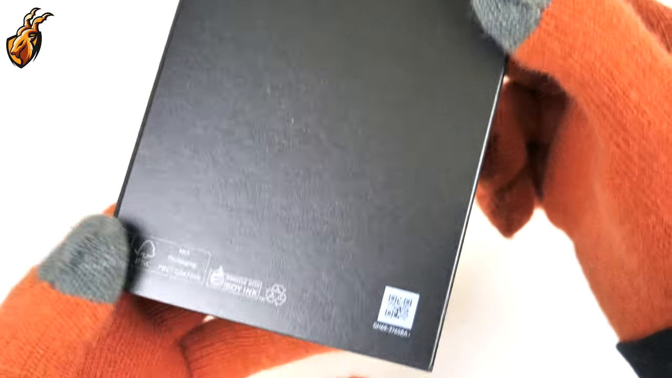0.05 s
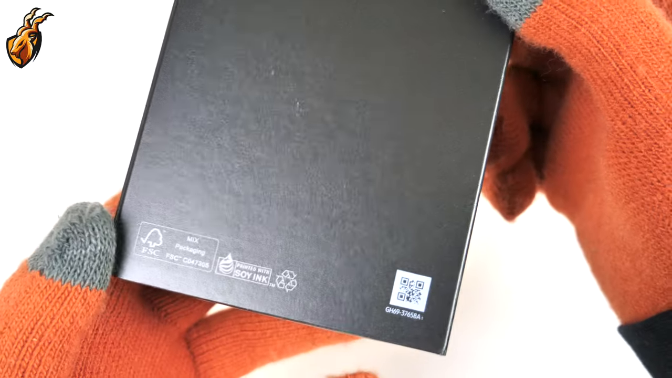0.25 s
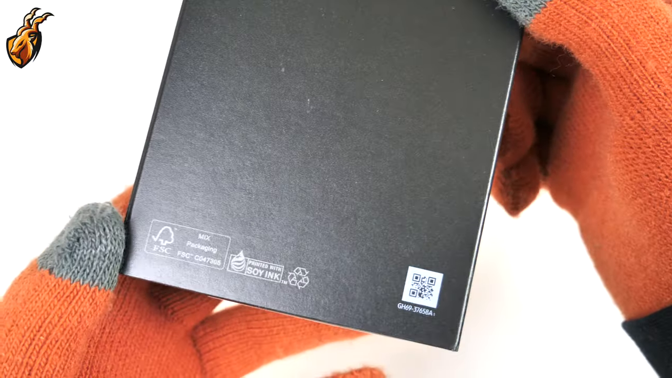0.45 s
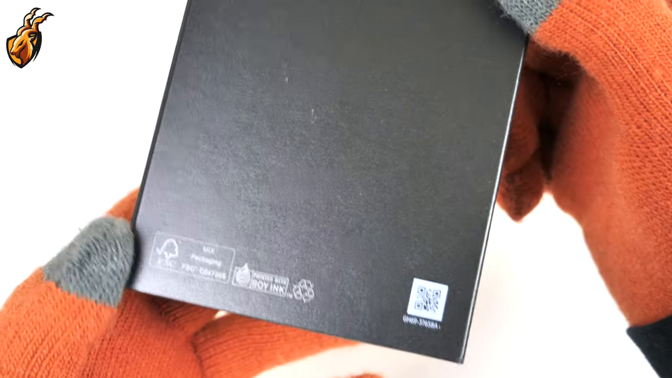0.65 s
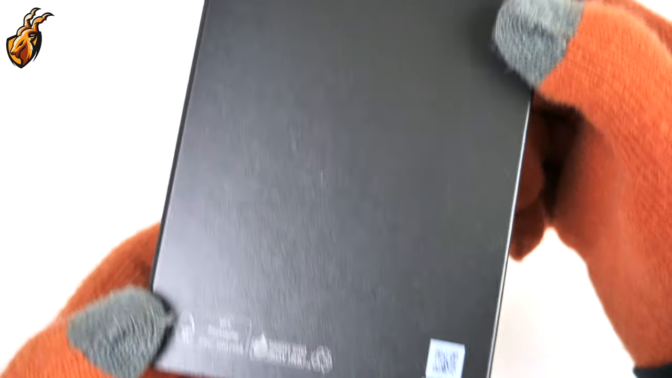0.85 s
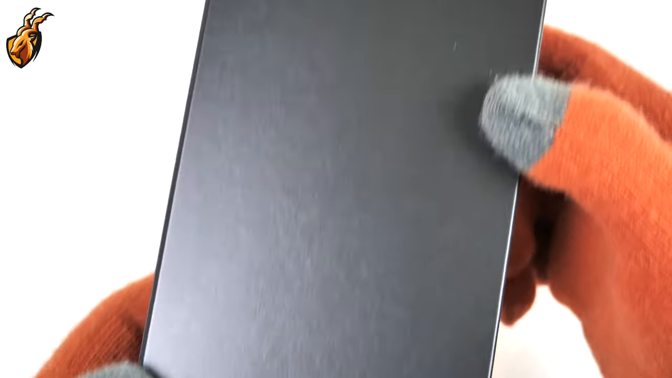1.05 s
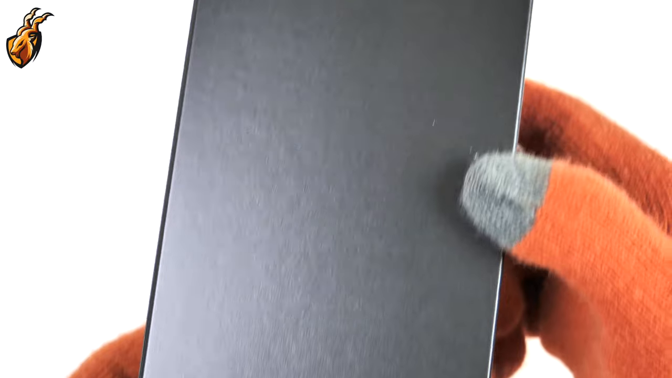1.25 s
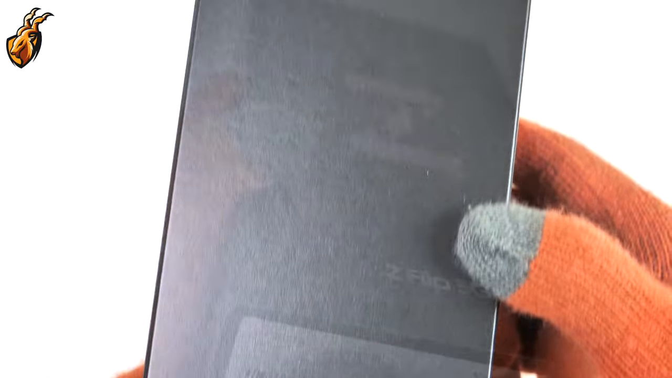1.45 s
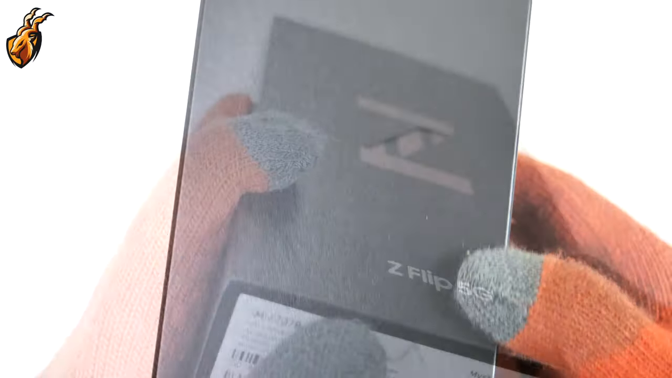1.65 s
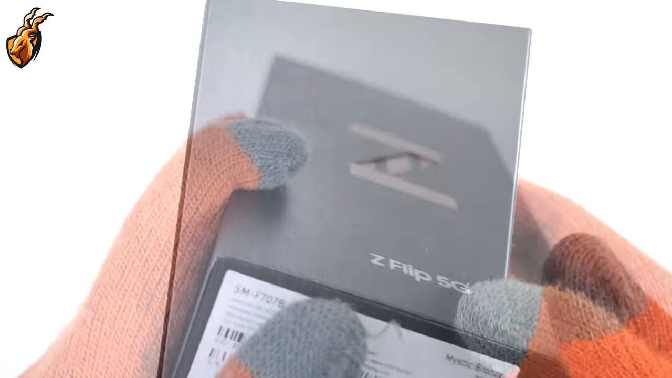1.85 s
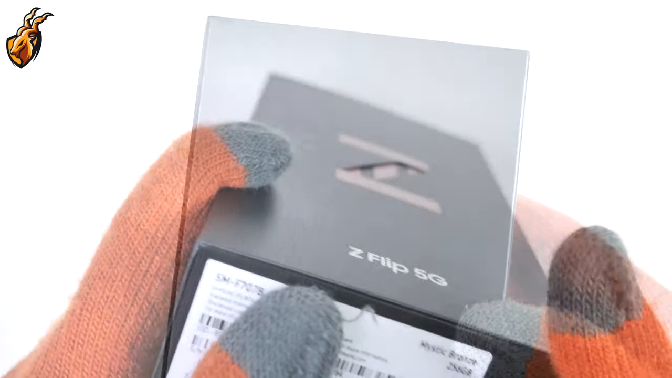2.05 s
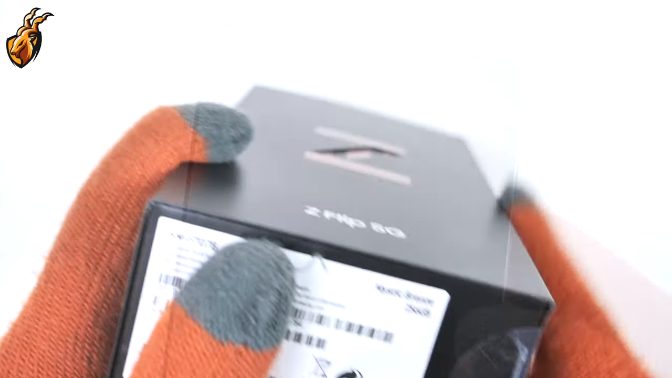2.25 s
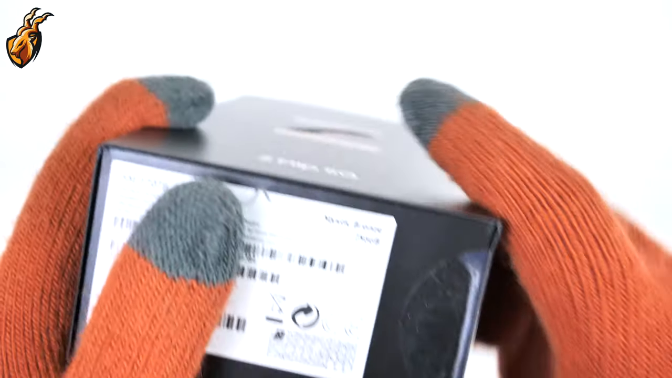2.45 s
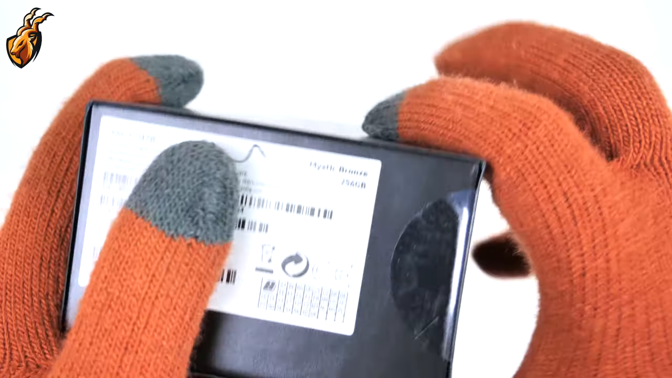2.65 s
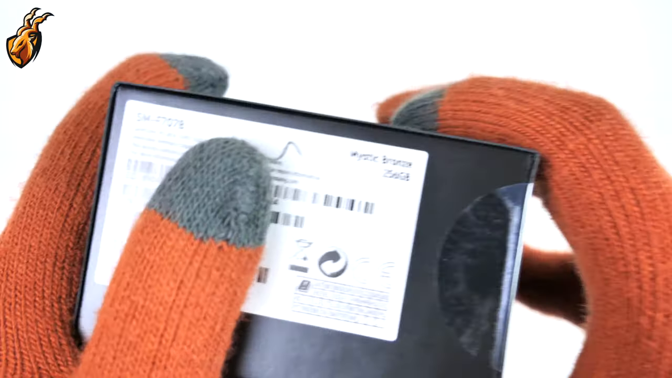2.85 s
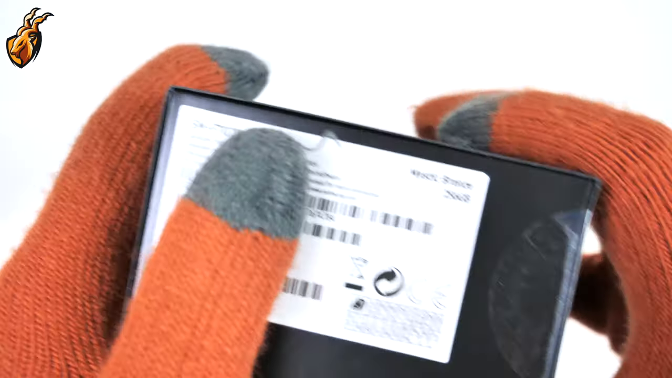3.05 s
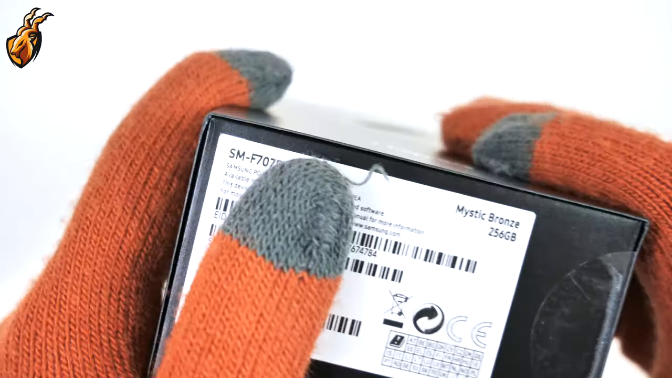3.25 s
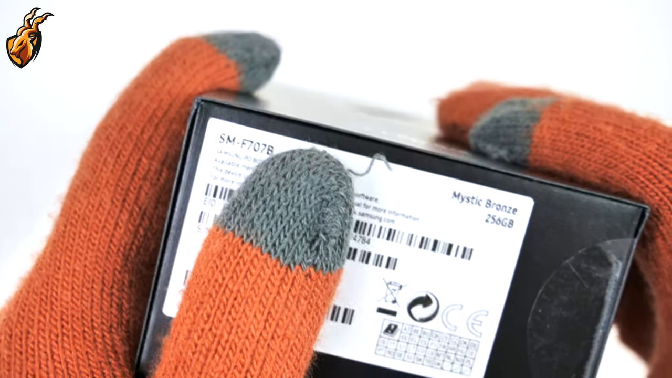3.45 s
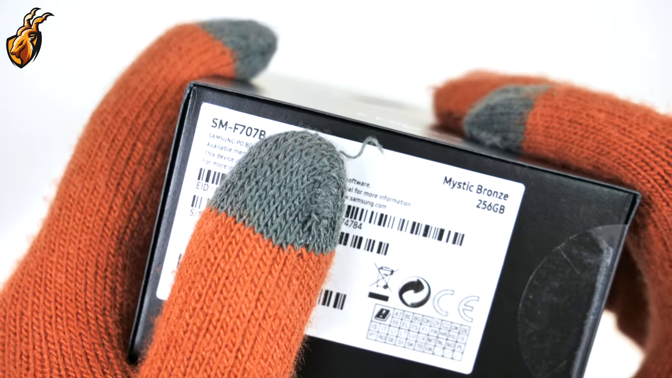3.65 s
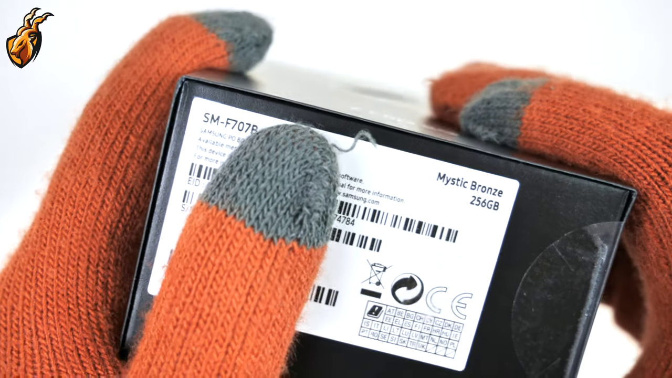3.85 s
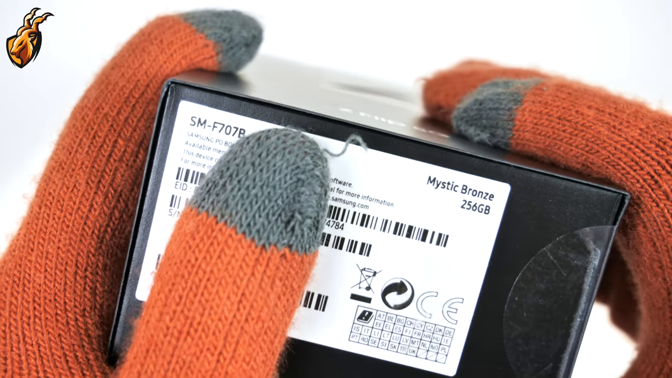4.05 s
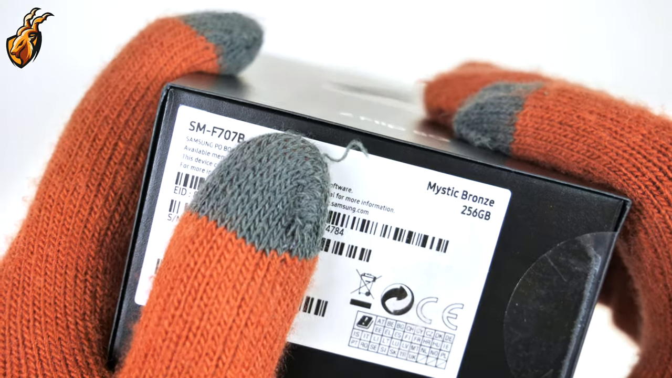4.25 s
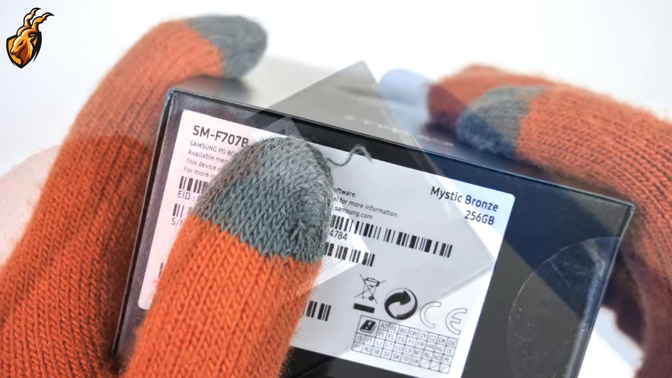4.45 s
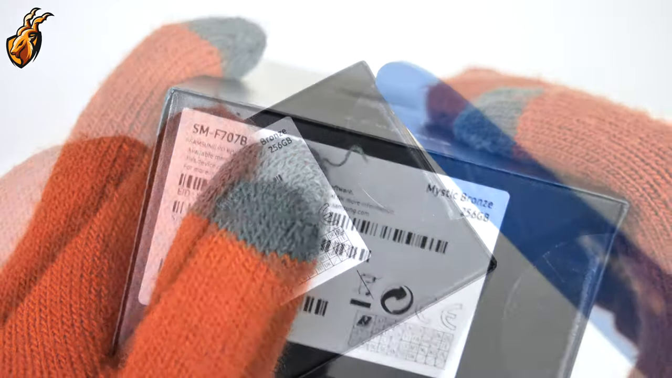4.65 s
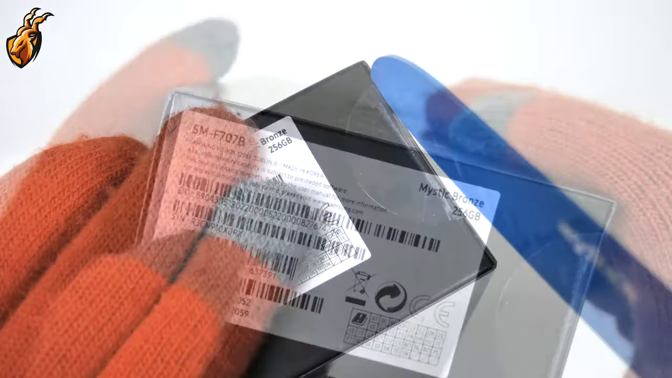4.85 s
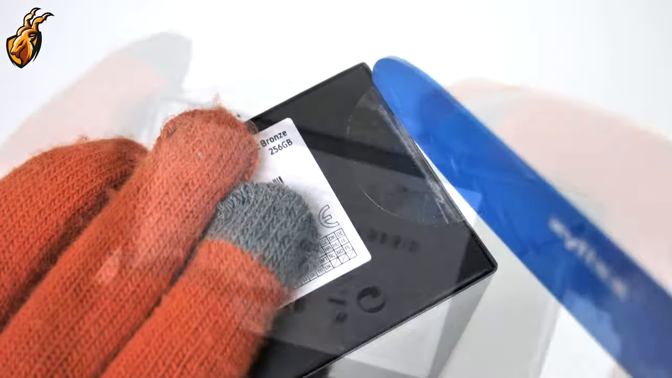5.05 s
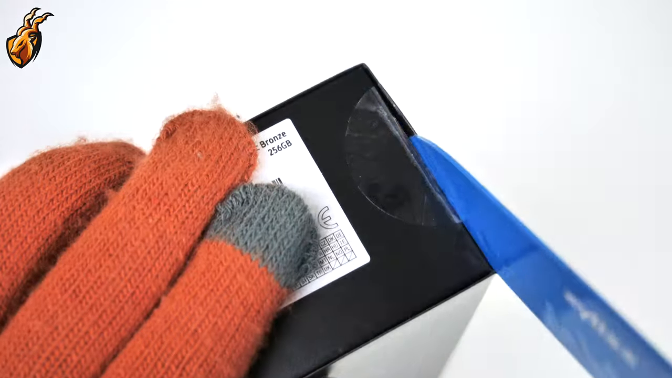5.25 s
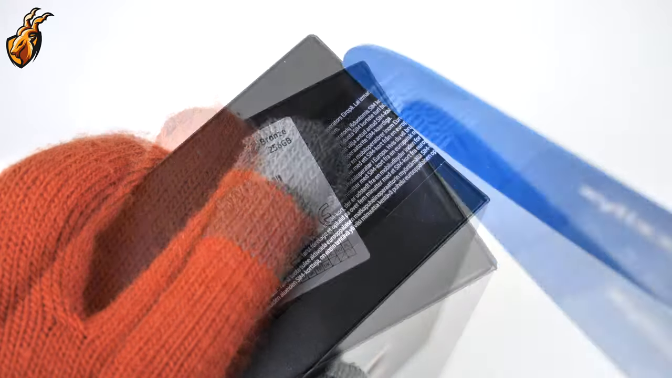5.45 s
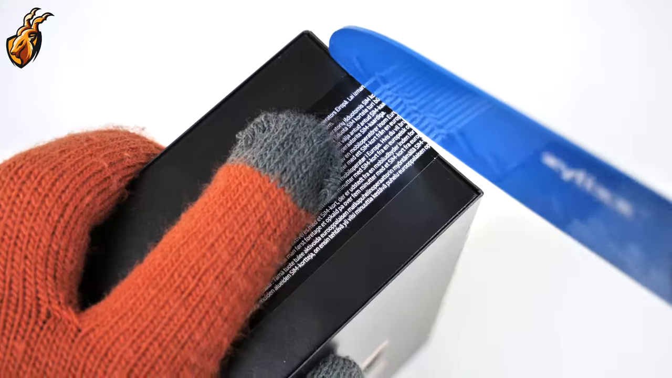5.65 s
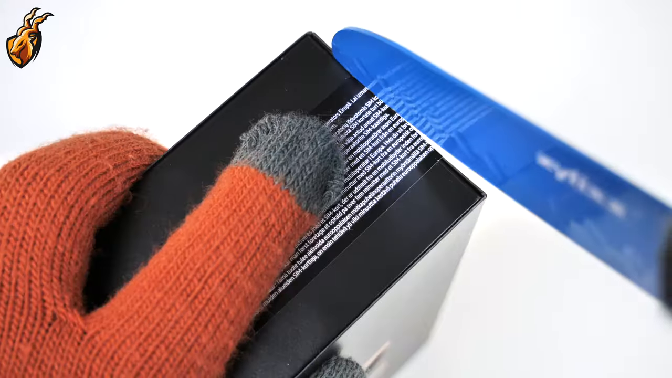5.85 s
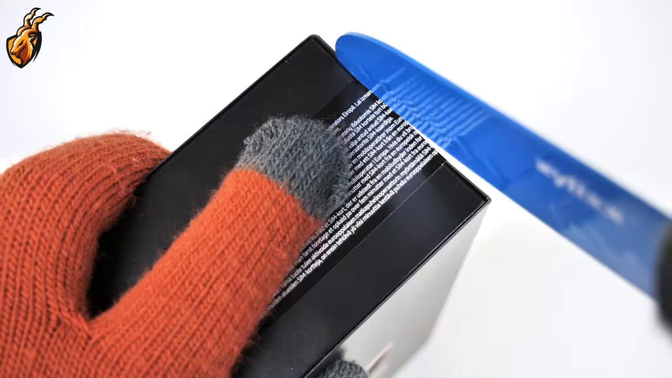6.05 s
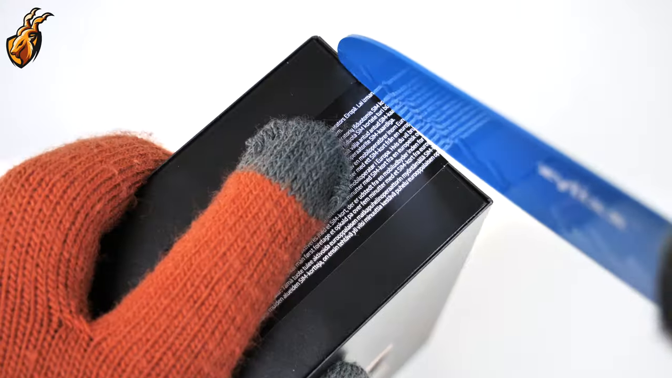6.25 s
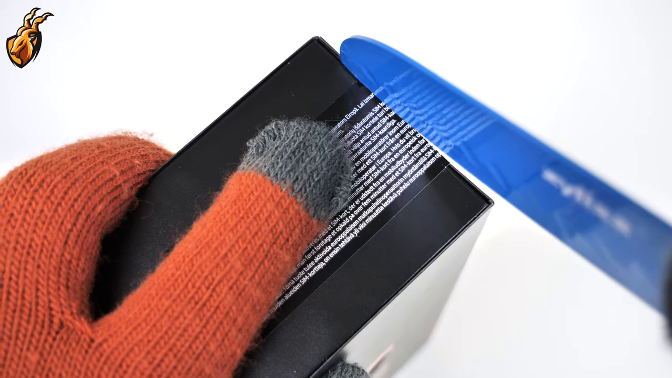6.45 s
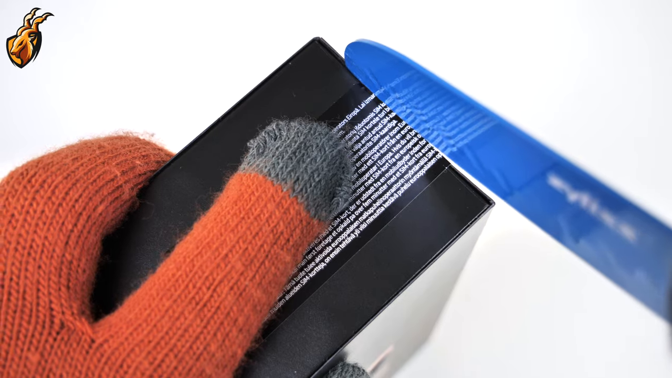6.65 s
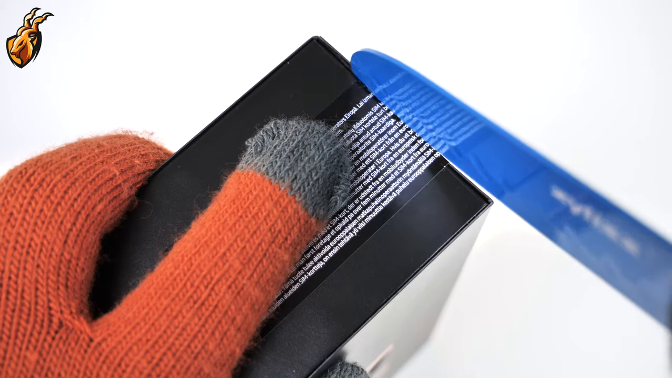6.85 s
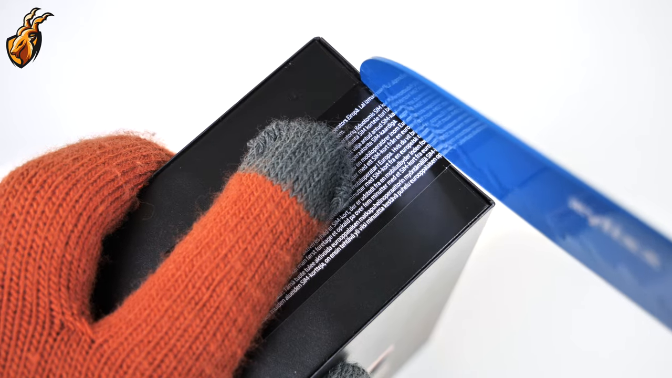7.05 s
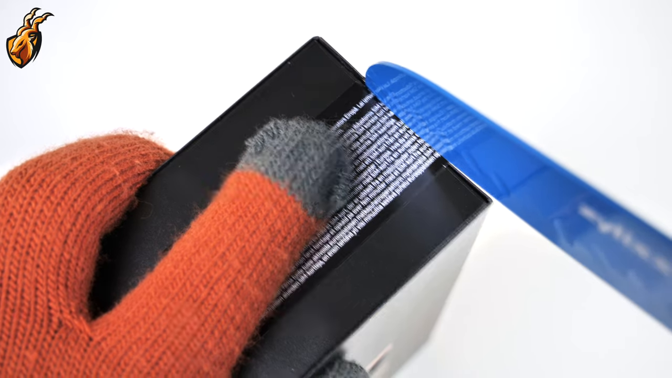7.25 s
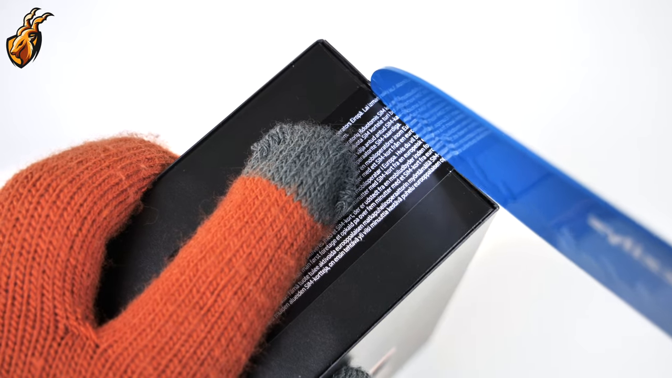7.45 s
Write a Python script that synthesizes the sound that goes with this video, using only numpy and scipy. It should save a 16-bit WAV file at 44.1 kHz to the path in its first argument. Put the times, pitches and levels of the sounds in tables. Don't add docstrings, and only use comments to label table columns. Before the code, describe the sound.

A small quiet room, heard very close, with steady soft hiss and faint low hum. From 0 to 1.8 seconds knitted gloves brush lightly over stiff card, with a tiny tick near 0.3 and a faint sliding thumb around 0.7 to 1.2. At about 1.95 a low hollow double knock of box and desk starts busier handling: woolly scrapes, snags and dry ticks until 3.1, with desk rumble and a softer double thump near 2.6. Then it is nearly still, with small snags at 3.4 and 4.1. Light shifting and a dull bump come at 4.6 to 4.8. At 5.11 to 5.16 tape rips in a brief crackle, peaking in a very loud, overloaded hollow crack. A sharp click follows at 5.42, fainter clicks near 5.65. Quiet handling leads to a much weaker rip and knock at 6.73, then faint rubbing, a tick at 7.0 and thin clicks around 7.4.

```python
import sys
import numpy as np
from scipy import signal
from scipy.fft import rfft, irfft
from scipy.io import wavfile
from scipy.ndimage import uniform_filter1d

SR = 44100
rng = np.random.default_rng(int(sys.argv[2]) if len(sys.argv) > 2 else 0)


def elevation(decibels):
    levels = np.asarray(decibels, float)
    return 10 ** (levels / 20)


def wrap_up_sound(samples):
    columns = np.atleast_2d(samples).T
    tamed = np.clip(columns, -1, 1)
    steps = np.round(tamed * 32767).astype(np.int16)
    wavfile.write(sys.argv[1], SR, steps)


N = 331632

# (start [s], length [s], weave scrape [dB], brightness [dB], card body over scrape [dB])
STROKES = [(-.17, .33, -56, 0.5, -5.5), (0.086, 0.32, -69.5, -0.5, 1.5), (0.593, 0.47, -64, -4, -3),
           (0.973, 0.31, -59.5, -5, -6), (1.45, 0.23, -71.5, -5, -2), (2.059, 0.2, -52, -1.5, -9),
           (2.171, 0.14, -53, 7, -16), (2.27, 0.13, -56, 2.5, -7), (2.382, 0.29, -56, 2.5, -5.5),
           (2.551, 0.29, -52, -2, -4), (2.8, 0.1, -59, -2.5, -1), (2.915, 0.13, -49, -4.5, -14),
           (3.041, 0.11, -57, -7, -4), (3.097, 0.344, -70.5, -6, 2.5), (4.623, .155, -59, -1, -5.5),
           (4.76, 0.18, -62.5, -3, -12), (5.198, 0.23, -57.5, -5, 3), (5.504, 0.16, -67, 0, 1),
           (6.769, 0.099, -75.5, 0, 3.5), (6.958, 0.2, -71, -3.5, 3.5), (7.25, 0.318, -69.5, 1.5, -2)]
SNAGS = [
    (2.357, 0.063, -52.5, 4, -5.5),
    (2.666, .05, -54, -1, 1),
    (3.362, 0.034, -55, -11.5, -4),
    (3.439, 0.051, -56, -4.5, -0.5),
    (4.057, .03, -60, -5, -10),
    (4.577, .018, -61, -13, -6),
    (5.396, 0.048, -52.5, 1, 0),
    (5.662, 0.034, -62, -1, -12),
    (7.384, 0.043, -64, -2, 2),
]
# (weave scrape [dB], brightness [dB], card body over scrape [dB])
GRIP = (-76, 3.4, 0.74)
# (from [s], to [s])
REST_RISE_TIMES = (4.9, 5.4)
REST_RISE_DB = 4
STROKE_SKEW, STROKE_ROUND = 0.85, 0.8
SNAG_SKEW, SNAG_ROUND = 0.63, 0.88
PRESS_SKEW, PRESS_ROUND = 0.45, 1.25
# (frequency [Hz], level [dB per Hz])
WEAVE = [(1700, -19.5), (2300, -5.5), (2700, -1), (4300, 1.5), (5000, -5.5), (6200, -40)]
# (frequency [Hz], level [dB per Hz])
CARD = [(350, -24.5), (600, -1.5), (1150, 2), (1900, -1.5), (2500, -14.5), (3200, -59)]
# (frequency [Hz], level [dB per Hz])
FIBRE = [(3900, -30), (5000, -6), (5700, -.5), (8000, -1.5), (9000, -6), (11000, -30)]
# (frequency [Hz], level [dB per Hz])
FIZZ = [(7200, -30), (9000, -6), (10200, -.5), (15500, -1.5), (17500, -20)]
FIZZ_SLOPE, FIZZ_DB = 1.05, 0
# (frequency [Hz], width [Hz], level [dB])
THUMB = [(1930, 330, -72.), (6480, 450, -66.)]
# (time [s], level [dB])
THUMB_PRESS = [(.63, -22.5), (.68, -6), (.87, 5.5), (.96, -1.5), (1.06, 7.5), (1.19, 4), (1.24, -15)]

# (start [s], length [s], frequency [Hz],
# width [Hz], level [dB])
CREAKS = [(-0., 0.27, 3116, 260, -64.5), (1.68, 0.095, 603, 91, -61.5), (3.81, 0.11, 505, 40, -69),
          (5.412, 0.0223, 1261, 119, -46.5), (2.941, 0.1, 2580, 300, -53), (4.601, 0.089, 344, 40, -63),
          (6.728, 0.0117, 4000, 298, -40), (6.939, 0.056, 647, 400, -58), (7.082, 0.033, 900, 894, -59.5)]

# (time [s], level [dB])
SWAY = [(0, -60), (.5, -66), (1.15, -58.5), (1.5, -70), (1.9, -63), (2.05, -37), (2.25, -30.5), (2.6, -42),
        (2.96, -42.5), (3.5, -56.5), (4.6, -61.5), (4.9, -44.5), (5.35, -31.5), (5.6, -59), (5.95, -38),
        (6.6, -48.5), (7.25, -49), (7.52, -31.5)]
# (start [s], length [s], desk shudder [dB], main panel [dB], box walls [dB])
PRESSES = [(0.612, 0.95, -59.5, -66, -67.5), (1.403, 0.33, -67.5, -65.5, -73),
           (2.007, 0.22, -47, -58.5, -53), (2.185, 0.4, -52.5, -52.5, -57.5), (2.533, 0.4, -49, -63, -53),
           (3.0, 1, -65.5, -73, -68), (4.37, 0.18, -63, -63, -85.5), (4.747, 0.11, -49.5, -63, -60.5),
           (5.25, 0.23, -54, -44.5, -45.5), (5.546, 0.155, -46, -56, -64), (5.773, 0.16, -62, -63, -69),
           (6.004, .15, -68.5, -62.5, -71), (6.46, 0.25, -63, -61, -74), (6.8, 0.19, -48, -52, -71),
           (6.938, 0.36, -59, -49.5, -61.5), (7.27, .4, -58.5, -63, -72)]
# (desk [dB], main panel [dB], box walls [dB])
MURMUR = (-67, -70, -73)
# (frequency [Hz], level [dB], time to fall 60 dB [s])
BOX = [(277.7, -7.5, 0.19), (310, -10.5, 0.16), (344.4, -13.5, 0.34), (360.5, 0, 0.085), (419, -5.5, 0.069),
       (437, -18.5, 0.41), (567, -17, .15), (697, -21.5, .3), (784, -17, 0.16), (872, -12.5, 0.12)]
# (frequency [Hz], level [dB], time to fall 60 dB [s])
DESK = [(55.8, -22, 0.33), (84, -6, 0.33), (98, -14.5, 0.108), (126.3, -9.5, 0.3), (160.7, -11.5, 0.17)]
# (frequency [Hz], level [dB], time to fall 60 dB [s])
PANEL = [(201.3, 3, 0.32), (221.6, -7, 0.11)]

# (frequency [Hz], level [dB per Hz])
HISS = [(12, -44), (20, -0.5), (59, 3.5), (79, -8), (107, -19), (308, -12.5), (408, -19), (693, -22),
        (843, -28.5), (3500, -29.5), (3910, -32), (14100, -29), (15800, -31.5)]
HISS_DB = -61.5
# (time [s], level [dB])
HISS_DRIFT = [(0, 5), (1.3, 5), (1.9, 1), (3.2, 7), (4.4, 4), (5.3, 8), (7.6, 7.5)]
# (frequency [Hz], width [Hz], level [dB])
HUM = [(62.4, 3.1, -63.5), (132.2, 6.9, -67)]
# (frequency [Hz], level [dB per Hz])
APART = [(24, -34.5), (40, -6.5), (112, 0.5), (275, 0), (327, -0.5), (747, -1.5), (1060, -3), (11400, -4),
         (15800, -6)]
APART_DB = -65

# (time [s], peak [dB], colour [Hz], body over peak [dB], body frequency [Hz])
TICKS = [(0.2962, -49.5, 3230, -15.5, 1500), (1.9415, -43.5, 4420, 14.5, 490),
         (2.375, -36.5, 5020, -31, 1440), (2.3854, -38.5, 3500, -0.5, 580), (2.6994, -42.5, 6680, 5, 563),
         (2.9307, -53.5, 4070, 7, 1240), (3.3044, -52.5, 3430, 1, 1213), (3.3662, -49.5, 2960, -13, 1170),
         (3.4461, -44, 4360, 4.5, 810), (4.0627, -48, 3770, 2, 1043), (4.581, -54.5, 2770, 2.5, 1074),
         (4.6339, -55, 2750, 3, 872), (5.4158, -38.5, 3688, -2, 1250), (5.5974, -52.5, 4120, 6, 557),
         (6.1973, -54.5, 3940, -16, 627), (6.989, -46.5, 3357, 9.5, 551)]
TICK_T60_S, SNAP_T60_S, BODY_T60_S = 0.045, 0.006, 0.018
SNAP_DB, EDGE_CLICK_DB = 4.5, -6.5

# (time [s], main panel [dB], box walls [dB], desk [dB], contact [ms])
PUSHES = [(1.934, -24.5, -57, -51, 4.86), (1.975, -27.5, -36, -22, 6.9), (2.575, -39.5, -32.5, -38, 4.5),
          (2.612, -54, -43, -38, 6.6), (4.807, -63, -57, -41, 6.3), (5.116, -46, -36, -43, 0.84),
          (5.1465, -15, -6.5, -7.5, 0.49), (5.597, -44, -44.5, -55.5, 0.98), (5.633, -51, -62, -56, 5.4),
          (6.7338, -25.5, -29.5, -30, 2.1), (6.988, -50.5, -53, -54, 0.18)]
# (time [s], main panel [dB], box walls [dB], desk [dB], contact [ms])
PULLS = [
    (1.941, -34, -34.5, -30.5, 1.177),
    (1.968, -35, -48, -17.5, 7.9),
    (4.787, -46.5, -47.5, -55, 4.2),
    (5.123, -31, -31, -24, 0.73),
    (5.145, -12, -18.5, -21, 0.39),
    (5.608, -55, -61.5, -32.5, 4.7),
    (6.707, -30, -36, -58, 0.36),
    (6.732, -32.5, -29.5, -24, 0.87),
]
# (frequency [Hz], level [dB], time to fall 60 dB [s])
SLAP = [(1160, 4.5, 0.0091), (1700, -2.0, 0.0053), (494, 4.0, 0.022)]
# (frequency [Hz], level [dB])
CROWD = [(240, -21.5), (450, -22), (850, -23.5), (1300, -27), (1900, -25.5), (3200, -32.5)]
# (frequency [Hz], time to fall 60 dB [s])
CROWD_T60 = [(240, 0.38), (1000, 0.31), (3200, 0.2)]

# (time [s], level [dB])
RIPS = [
    [(5.109, -33.5), (5.112, -45.5), (5.121, -24), (5.125, -19.5), (5.139, -22), (5.1445, -19.5),
     (5.15, -25), (5.165, -56.5)],
    [(6.703, -52), (6.707, -37.5), (6.718, -44.5), (6.729, -43), (6.732, -41), (6.74, -41)],
]
RIP_TOP_DB = [0, -5]
# (frequency [Hz], level [dB per Hz])
RIP_COLOUR = [(150, -32.5), (400, 6), (850, 6), (1300, 2.5), (2500, -2.5), (4200, 1.5), (6200, -3.5),
              (9000, -5), (15000, -4), (16500, -31.5)]
# (frequency [Hz], level [dB], time to fall 60 dB [s])
BLADE = [(3450, -5, .03), (4090, -1, .06), (4330, -4, .04)]

# (time [s], peak [dB], brightness [dB])
CLICKS = [
    (5.4153, -24, -2.5),
    (5.631, -45, -3),
    (5.6522, -43, -8),
    (5.6636, -34, -5),
    (7.3855, -45, -8),
    (7.3965, -44, -8),
    (7.402, -36, 5.5),
    (7.45, -48, 10),
]
# (frequency [Hz], level [dB], time to fall 60 dB [s])
CLICK_MODES = [(3500, -2, .006), (4600, 0, 0.0055), (6640, 1, .004), (9000, 2, .004), (12200, 1.5, .004)]

# (frequency [Hz], time to fall 60 dB [s])
ROOM = [(150, 0.13), (500, 0.55), (1500, 0.67), (4000, 0.43), (9000, 0.36), (15000, 0.089)]


def evened(x):
    return x / np.sqrt(np.mean(x ** 2) + 1e-20)


def read(points, hz):
    f, value = np.transpose(points)
    return np.interp(np.log(hz + 1), np.log(f + 1), value)


def curve(points):
    return np.interp(np.arange(N) / SR, *np.transpose(points))


def add(mix, s, sound):
    part = mix[round(s * SR):][:len(sound)]
    part += sound[:len(part)]


def coloured(points, x):
    gain = elevation(read(points, np.fft.rfftfreq(len(x), 1 / SR)))
    return evened(irfft(rfft(x) * gain, len(x)))


def band(x, lo_hz, hi_hz):
    sos = signal.butter(2, [lo_hz, min(hi_hz, 0.45 * SR)], "band", fs=SR, output="sos")
    return evened(signal.sosfilt(sos, x))


def resonate(x, hz, width):
    return evened(signal.lfilter(*signal.iirpeak(hz, hz / width, SR), x))


def ring(modes, seconds=0.52):
    t = np.arange(round(seconds * SR)) / SR
    return sum(elevation(db - 60 * t / t60) * np.sin(2 * np.pi * hz * t) for hz, db, t60 in modes)


def arches(rows, skew, roundness):
    start, length = np.transpose(rows)[:2, :, None]
    u = np.clip((np.arange(0, N, 32) / SR - start) / length, 0, 1)
    return abs(np.sin(np.pi * u ** skew)) ** roundness


def summed(arch, dbs, rest):
    power = np.interp(np.arange(N), np.arange(0, N, 32), elevation(dbs) ** 2 @ arch ** 2)
    return np.sqrt(power + rest ** 2)


def fibres(per_s, spread_db):
    clump = elevation(0.77 * evened(uniform_filter1d(rng.standard_normal(N), 500)))
    size = elevation(spread_db * np.minimum(rng.exponential(1, N), 4)) * rng.standard_normal(N)
    happens = rng.random(N) < per_s / SR
    return evened(clump * size * happens)


def gloves():
    slips = fibres(per_s=13000, spread_db=-0.5)
    rows = np.array(STROKES + SNAGS + [(0, 1, *GRIP)])
    strokes = arches(STROKES, STROKE_SKEW, STROKE_ROUND)
    snags = arches(SNAGS, SNAG_SKEW, SNAG_ROUND)
    arch = np.vstack([strokes, snags])
    db, bright, card = rows.T[2:]
    grip = elevation(np.interp(np.arange(N) / SR, REST_RISE_TIMES, (0, REST_RISE_DB)))
    paths = [(WEAVE, db), (CARD, db + card), (FIBRE, db + bright),
             (FIZZ, db + FIZZ_SLOPE * bright + FIZZ_DB)]
    rub = np.zeros(N)
    for colour, dbs in paths:
        rub += summed(arch, dbs[:-1], grip * elevation(dbs[-1])) * coloured(colour, slips)
    sing = sum(elevation(db) * resonate(rng.standard_normal(N), hz, width) for hz, width, db in THUMB)
    return rub + elevation(curve(THUMB_PRESS)) * sing


def creaks():
    out = np.zeros(N)
    for s, length, hz, width, db in CREAKS:
        n = round(length * SR)
        add(out, s, elevation(db) * resonate(rng.standard_normal(n), hz, width) * np.hanning(n))
    return out


def handling():
    force = rng.standard_normal((4, N))
    sway = band(band(band(force[0], 7, 24), 6, 26), 5, 30)
    shudder = resonate(force[1], DESK[1][0], 25) + 0.5 * band(force[1], 47, 146)
    panel = resonate(force[2], PANEL[0][0], 24)
    walls = evened(signal.fftconvolve(force[3], ring(BOX[:6]))[:N])
    walls = walls + 2.1 * band(force[3], 210, 540)
    arch = arches(PRESSES, PRESS_SKEW, PRESS_ROUND)
    pressed = np.zeros(N)
    for sound, dbs, still_db in zip((shudder, panel, walls), np.transpose(PRESSES)[2:], MURMUR):
        pressed += summed(arch, dbs, elevation(still_db)) * evened(sound)
    return elevation(curve(SWAY)) * sway + pressed


def floor():
    hiss = elevation(HISS_DB) * coloured(HISS, rng.standard_normal(N))
    low = uniform_filter1d(hiss, 15)
    hum = sum(elevation(db) * resonate(rng.standard_normal(N), hz, width) for hz, width, db in HUM)
    hum += elevation(-59.5) * np.sin(2 * np.pi * HUM[0][0] * np.arange(N) / SR)
    return low + (hiss - low) * elevation(curve(HISS_DRIFT)) + hum


def ticks():
    out = np.zeros(N)
    t = np.arange(4000) / SR
    for s, db, hz, body_db, body_hz in TICKS:
        a, b = rng.standard_normal((2, len(t)))
        crack = evened(band(a, 2500, 11000) + 0.43 * resonate(a, hz, 750))
        crack += elevation(body_db) * evened(band(b, 490, 2140) + 0.87 * resonate(b, body_hz, 160))
        fall = elevation(-60 * t / TICK_T60_S) * np.minimum(t / 0.00091, 1)
        snap = ring([(hz, SNAP_DB, SNAP_T60_S), (body_hz, body_db, BODY_T60_S)], seconds=0.05)
        add(out, s, elevation(db - 8) * fall * crack)
        add(out, s, elevation(db) * snap)
        add(out, s, elevation(db + EDGE_CLICK_DB - 60 * t / SNAP_T60_S) * band(a, 5000, 14000))
    return out


def knocks():
    out = np.zeros(N)
    panel, box, desk, slap = ring(PANEL), ring(BOX), ring(DESK), ring(SLAP)
    hz = np.sort(np.exp(rng.uniform(np.log(CROWD[0][0]), np.log(CROWD[-1][0]), size=70)))
    crowd = np.array([ring([mode]) for mode in zip(hz, read(CROWD, hz), read(CROWD_T60, hz))])
    blows = sorted([(*row, 1) for row in PUSHES] + [(*row, -1) for row in PULLS])
    spots = rng.standard_normal((len(blows), len(hz)))
    for (s, panel_db, box_db, desk_db, ms, way), spot in zip(blows, spots):
        force = np.hanning(max(round(ms * SR / 1000), 4))
        rings = elevation(panel_db) * panel
        rings = rings + elevation(box_db) * (box + slap + spot @ crowd)
        rings = rings + elevation(desk_db) * desk
        add(out, s, way * signal.fftconvolve(rings, force / force.sum()))
    return out


def rips():
    crackle = coloured(RIP_COLOUR, fibres(per_s=17000, spread_db=2))
    dull = uniform_filter1d(crackle, size=4)
    t = np.arange(N) / SR
    rip = np.zeros(N)
    for rows, top_db in zip(RIPS, RIP_TOP_DB):
        level = elevation(np.interp(t, *np.transpose(rows), -200, -200))
        rip += (dull + elevation(top_db) * (crackle - dull)) * level
    return rip + elevation(-44) * signal.fftconvolve(rip, ring(BLADE))[:N]


def clicks():
    out = np.zeros(N)
    for s, db, bright_db in CLICKS:
        modes = []
        for hz, own_db, t60 in CLICK_MODES:
            octaves = np.log2(hz / CLICK_MODES[0][0])
            modes.append((hz, own_db + bright_db * octaves / 2, t60))
        add(out, s, elevation(db - 6.5) * ring(modes, seconds=0.02))
    return out


def room(x):
    taps = np.zeros((2, SR // 2))
    jitter = rng.integers(0, 20, (2, (SR // 2 - 201) // 20))
    at = np.arange(200, SR // 2 - 20, 20) + jitter
    np.put_along_axis(taps, at, rng.choice([-1., 1.], at.shape), 1)
    hz, t, z = signal.stft(taps, SR, nperseg=256)
    tail = signal.istft(z * elevation(-60 * t / read(ROOM, hz)[:, None]), SR, nperseg=256)[1]
    return signal.fftconvolve(x[None], tail / np.linalg.norm(tail[0]), axes=1)[:, :N]


def scene():
    rub = gloves()
    sharp = creaks() + ticks() + rips() + clicks()
    blows = knocks()
    wet, wide = room(elevation(-12) * sharp + elevation(-23.5) * blows + elevation(-18.5) * rub)
    mid = sharp + rub + blows + wet + handling() + floor()
    side = elevation(APART_DB) * coloured(APART, rng.standard_normal(N))
    side += elevation(-22) * signal.lfilter([1, -0.8], [1], wide)
    return np.array([mid + side, mid - side])


def low_pass(x):
    return signal.sosfilt(signal.butter(12, 16180, fs=SR, output="sos"), x)


def record(dry):
    edge = signal.firwin(255, 15900, window=("kaiser", 7), fs=SR)
    overloaded = np.clip(dry, -1, 1)
    limited = signal.oaconvolve(overloaded, edge[None], "same")
    return low_pass(np.clip(limited, -1, 1))


dry = scene()
out = record(dry)
wrap_up_sound(out)
```